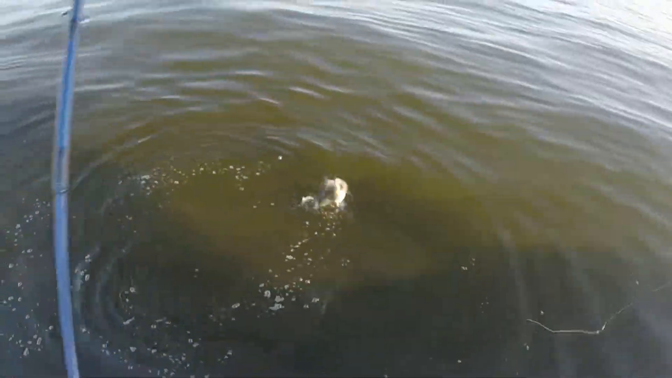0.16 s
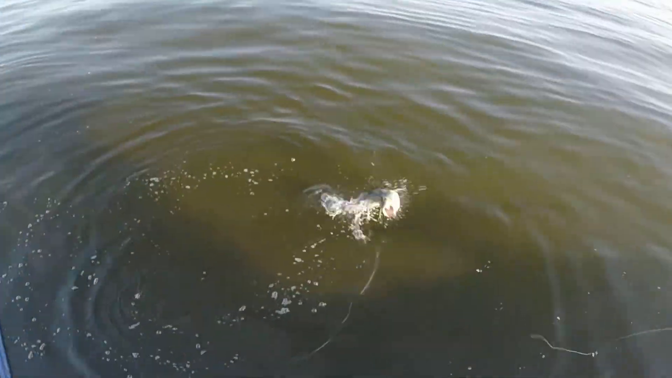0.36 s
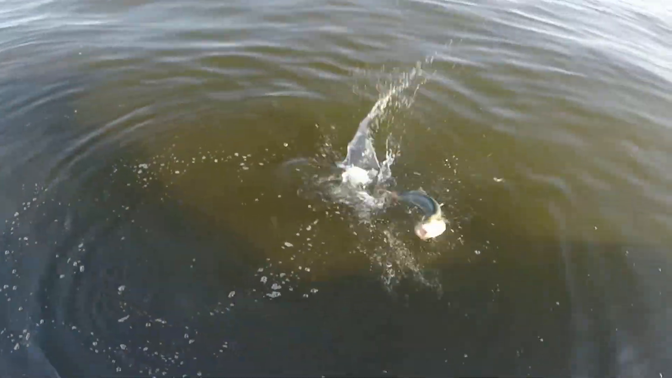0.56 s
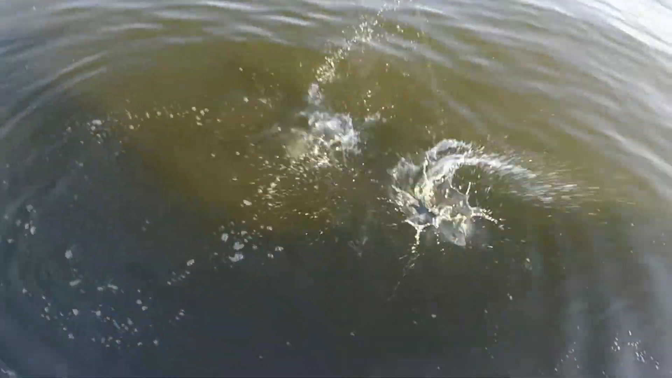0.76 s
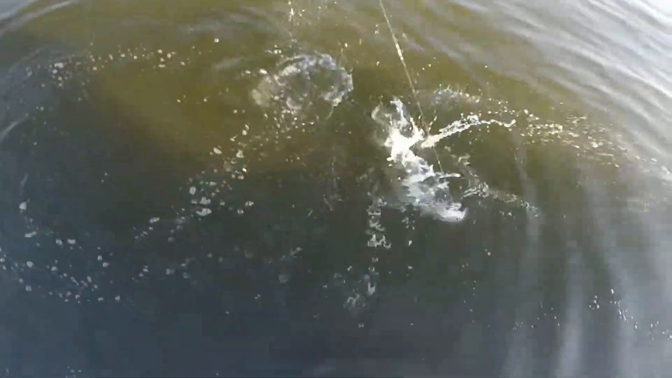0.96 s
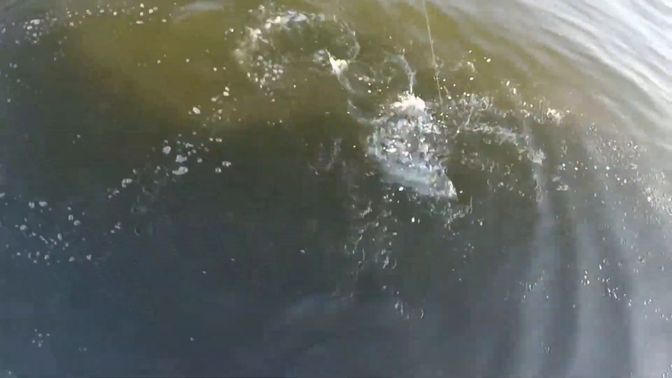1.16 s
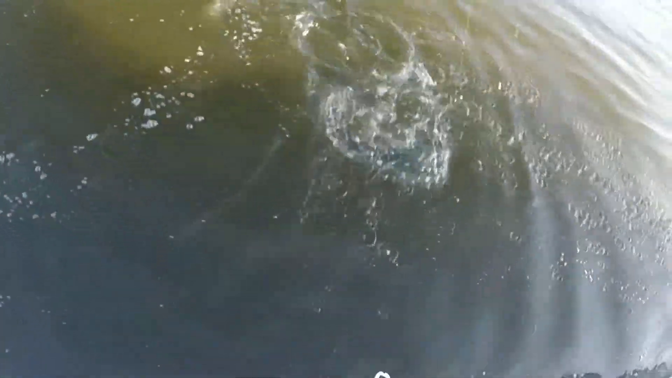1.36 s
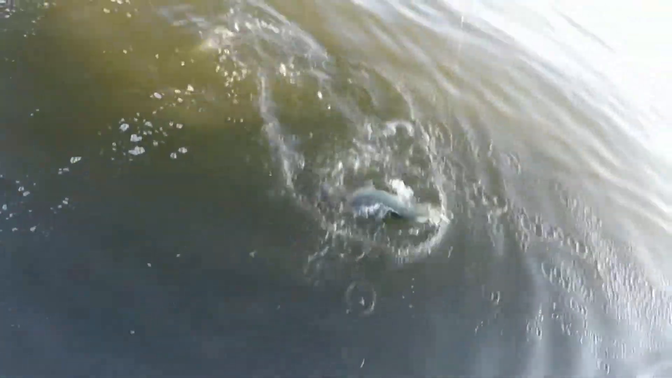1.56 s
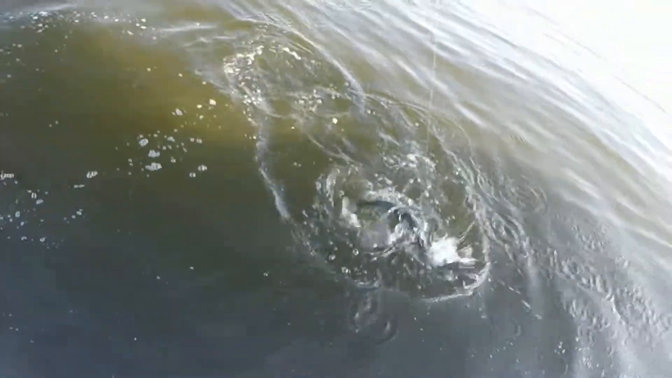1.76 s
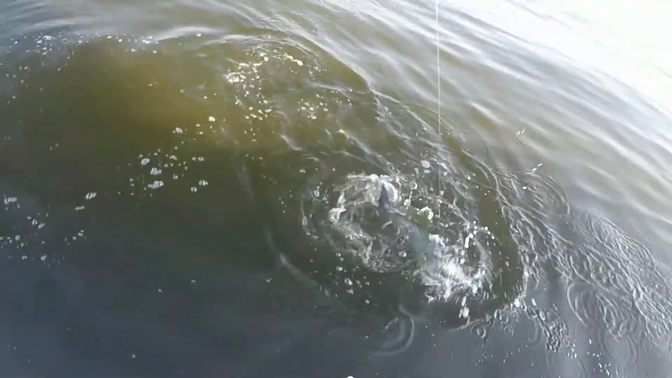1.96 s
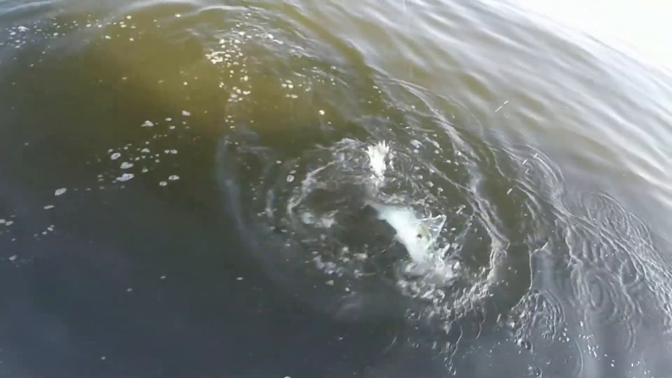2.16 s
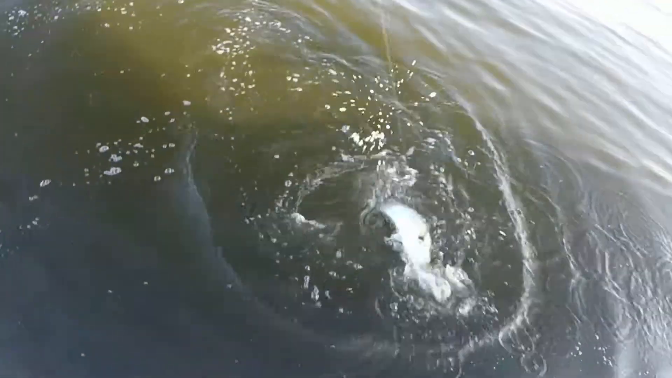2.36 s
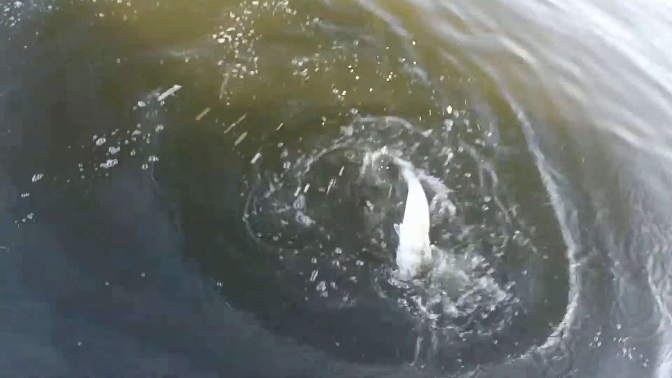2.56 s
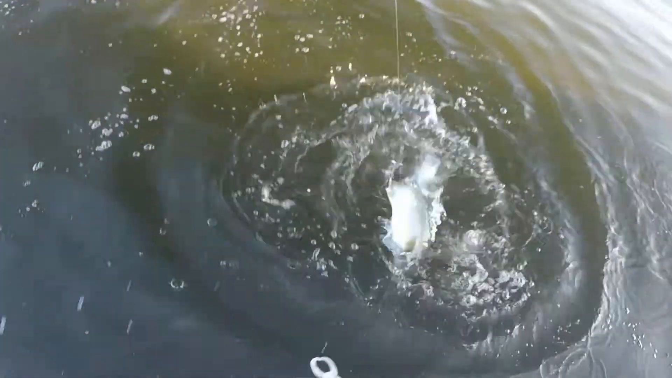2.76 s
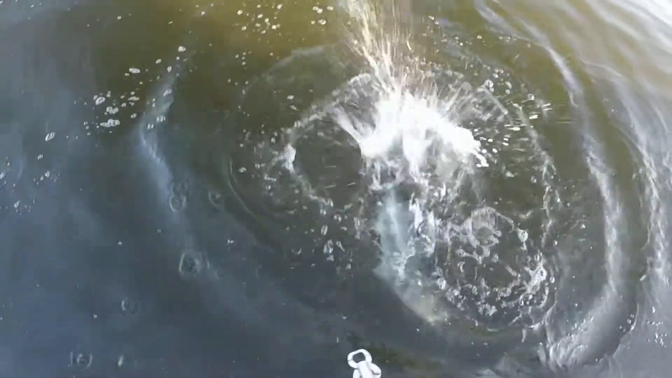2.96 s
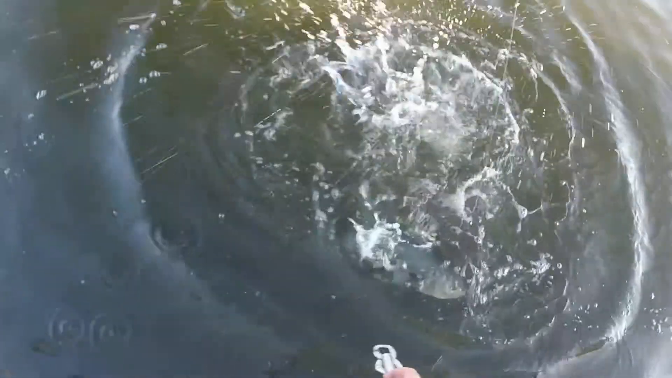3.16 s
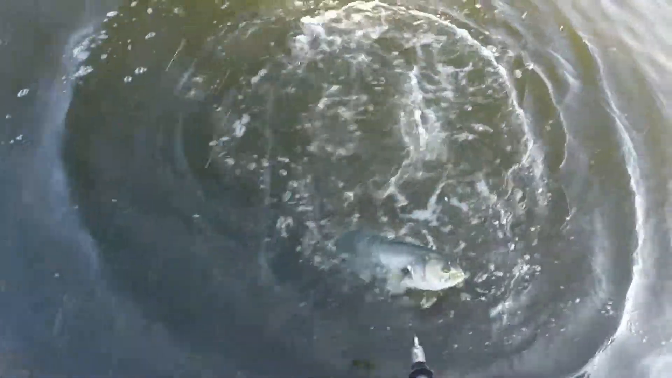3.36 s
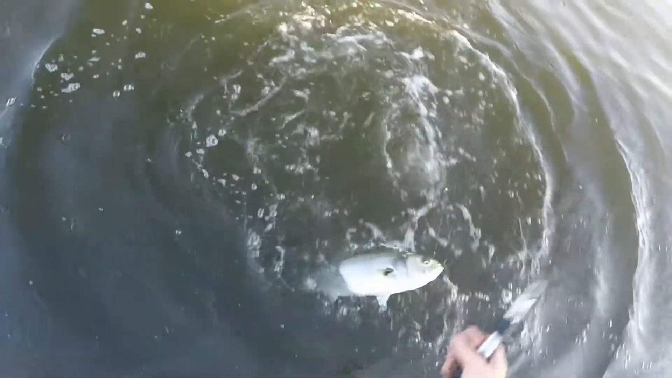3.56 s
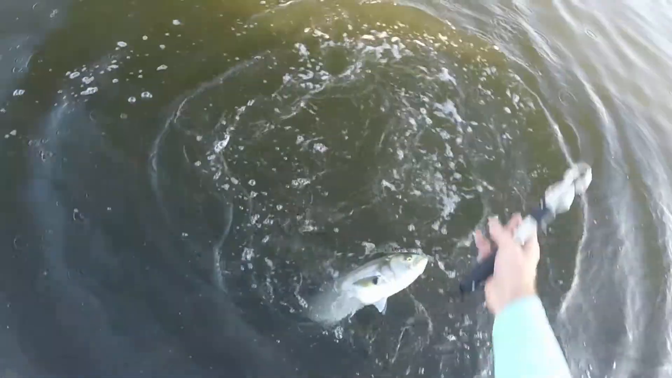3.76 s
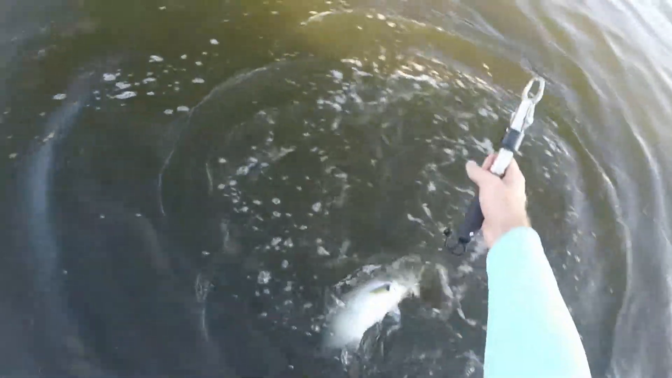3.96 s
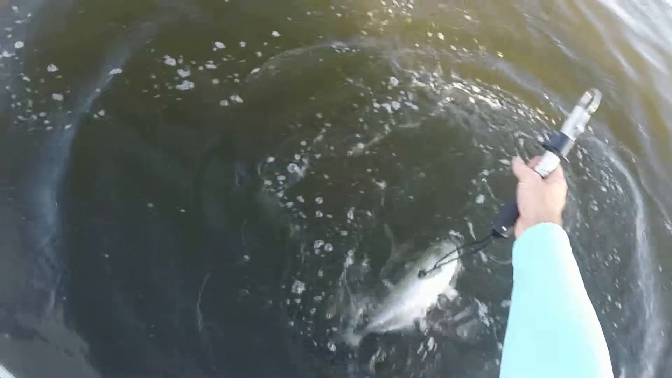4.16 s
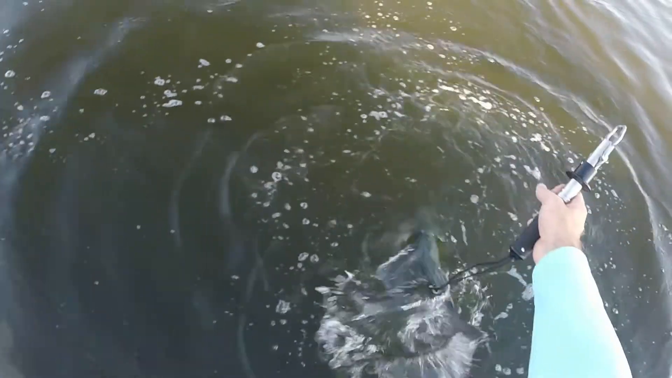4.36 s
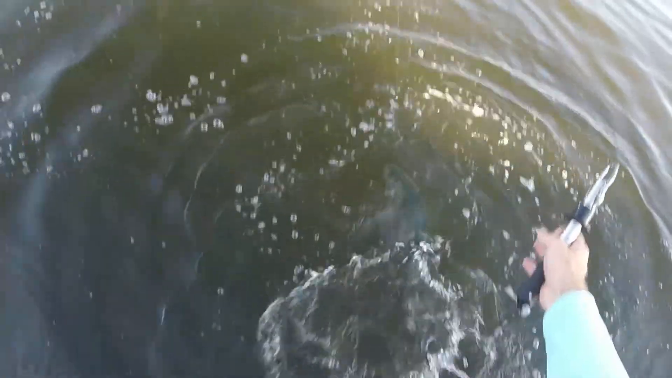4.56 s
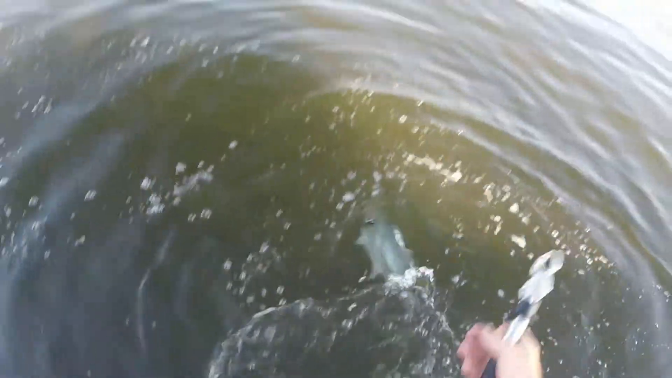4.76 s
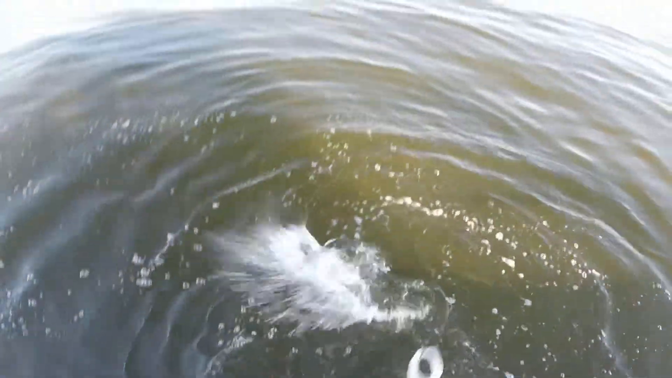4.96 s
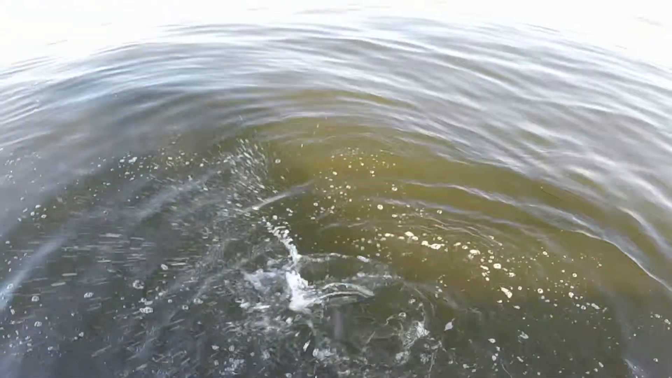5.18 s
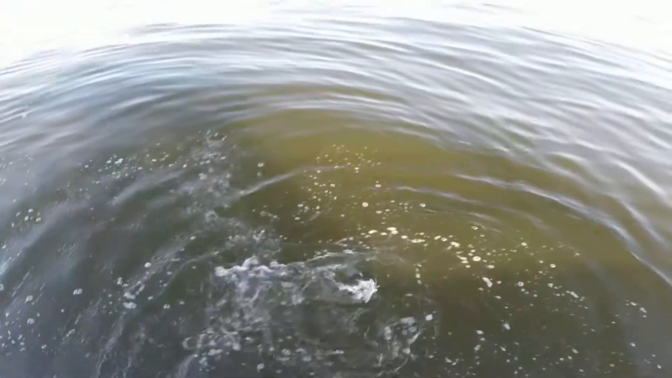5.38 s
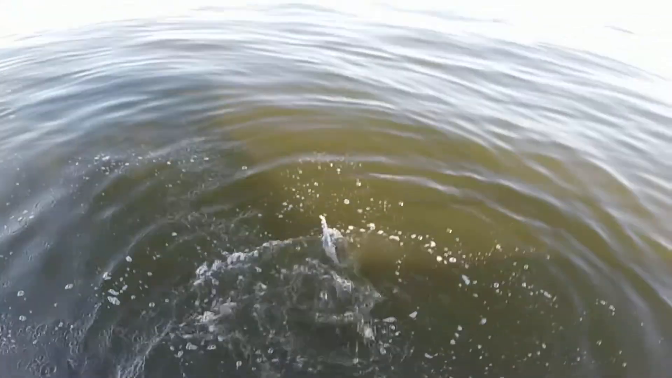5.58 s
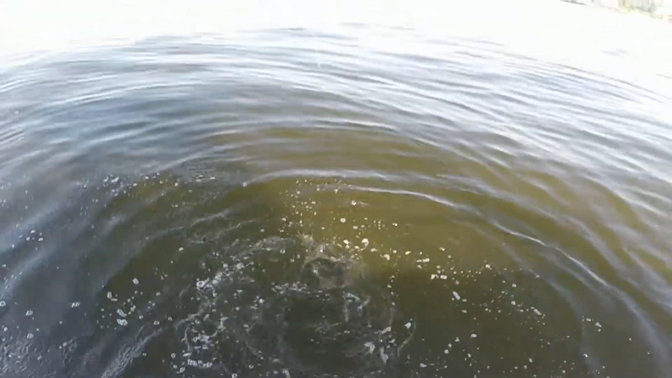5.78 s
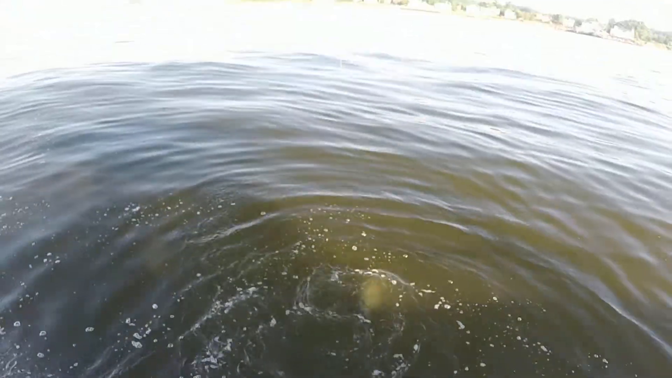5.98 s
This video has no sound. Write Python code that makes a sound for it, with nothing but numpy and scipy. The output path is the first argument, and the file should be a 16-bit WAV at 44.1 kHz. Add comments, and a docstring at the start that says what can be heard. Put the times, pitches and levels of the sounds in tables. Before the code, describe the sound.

A hooked fish thrashes at the surface beside a small boat, throwing irregular bursts of spray with slaps, spattering drops and small gurgles. The microphone sits inside a sealed camera housing, so the water sounds thin and boxy over low rumble and faint hiss. Two deep thumps come through the mount early on, the splashing peaks midway, and something hard knocks the hull before the last thrash.

```python
"""A hooked fish thrashes beside a small boat, heard from inside a sealed camera housing.
Low rumble, amplifier hiss and faint swirling water run from the start. At 0.1 s a jolt of the wearer
thumps through the mount. From 0.2 s the fish throws spray, with slaps, spatters and later gurgles;
the shell's resonances colour the spray and cracks. A second jolt comes at 2 s, the loudest slaps
near 3 s. At 4.8 s something hard knocks the hull; the last thrash follows at 5.4 s."""
import sys
import numpy as np
from scipy import signal
from scipy.fft import rfft, irfft, next_fast_len
from scipy.io import wavfile

SR = 44100
rng = np.random.default_rng(int(sys.argv[2]) if len(sys.argv) > 2 else 0)


def dump_mix(stems):
    """Bounce the given channels to the path in sys.argv[1] as a 16-bit WAV at rate SR."""
    frames = np.atleast_2d(stems).T  # one column per channel
    limited = np.clip(frames, -1, 1)  # hard clip at full scale
    pcm = np.round(limited * 32767).astype(np.int16)
    wavfile.write(sys.argv[1], SR, pcm)


N = 265683

# Sway of the mount. Each row: time in seconds, rumble level in dB.
MOUNT_SWAY = [(0, -70), (0.08, -41), (0.3, -48), (0.4, -47), (0.62, -48), (0.69, -57), (0.78, -34),
              (0.96, -39.5), (1.05, -51.5), (1.33, -42.5), (1.43, -60), (1.53, -42), (1.9, -40), (2.0, -47),
              (2.2, -43.5), (2.32, -58), (2.38, -46), (3.25, -48), (3.57, -53), (3.76, -38), (3.88, -53),
              (3.95, -47), (4.8, -48), (5.19, -44.5), (5.55, -44), (5.83, -54), (5.93, -44), (6.02, -68)]
# Rumble spectrum. Each row: frequency in Hz, relative density in dB.
RUMBLE_SPECTRUM = [(8, 4), (14, 21), (28, 8.5), (45, -2), (80, -23), (140, -37), (400, -70), (2000, -120)]
# Amplifier hiss spectrum. Each row: frequency in Hz, relative density in dB.
HISS_SPECTRUM = [(30, -33), (55, -1.5), (147, -2.5), (287, -6), (499, -9), (1100, -14.5), (1540, -17),
                 (2310, -20.5), (4000, -25.5), (7000, -30.5), (12000, -37.5), (13500, -43), (15300, -43)]
# Circuit tones. Each row: frequency in Hz, rms level in dB.
CIRCUIT_TONES = [(14147, -95), (14207, -95)]
# Shell resonances. Each row: centre in Hz, width in Hz, gain in dB.
HOUSING_MODES = [(741, 274, -4), (1560, 187, 0), (1980, 365, -1.5), (2780, 240, 2.5), (3254, 316, 0.5),
                 (4664, 370, 1), (5800, 234, -2), (6160, 400, -6.5), (6970, 580, -7.5), (8400, 5300, -21),
                 (11500, 1400, -19.5), (13200, 1500, -33)]
# Restless water between thrashes. Each row: time in seconds, spray gain in dB.
WATER_SWIRL = [(0, -68), (0.3, -69), (0.7, -64), (1.4, -64.5), (1.7, -63), (1.85, -58.5), (2.1, -62.5),
               (2.33, -67), (2.65, -62.5), (2.95, -59), (3.35, -60.5), (3.7, -66), (3.95, -67), (4.3, -64),
               (4.8, -65.5), (5.25, -63.5), (5.6, -67.5), (6.02, -74)]
# Sheets of spray thrown by the fish. Each row: end of the rise in seconds, spray gain in dB,
# hold in seconds, fine droplets in dB relative to that gain.
FISH_THRASHES = [(0.242, -59, .005, -16), (0.33, -56, 0.043, -11.5), (0.46, -62.5, .17, -3.5),
                 (0.713, -57, .1, -1.5), (0.902, -54.5, .035, -6.5), (1.042, -60.5, 0.058, -10),
                 (1.105, -57.5, .14, -8), (1.305, -63.5, 0.076, -16), (1.562, -66.5, .08, -20),
                 (1.772, -51.5, .025, -9), (2.112, -54, .045, -8), (2.186, -56, 0.0088, -5),
                 (2.405, -58.5, .04, -4.5), (2.506, -62.5, 0.052, -6), (2.718, -55, 0.043, -6),
                 (2.775, -57.5, .02, -5), (2.811, -52.5, 0.035, -8), (2.996, -54, 0.031, -2),
                 (3.09, -57, .19, -6), (3.327, -62.5, .035, 0), (3.45, -57, .005, -17),
                 (3.865, -63, 0.039, -5), (4.25, -64, .008, -18), (4.41, -57, .16, -4),
                 (4.68, -56.5, 0.011, -12), (5.009, -55, .04, -8), (5.08, -58, .14, -10.5),
                 (5.362, -63.5, 0.017, -2)]
# Slaps and plops. Each row: start in seconds, level in dB, bubble pitch in Hz, bubble t60 in seconds,
# crack in dB relative to the bubble.
WATER_SLAPS = [(0.065, -48, 2250, 0.074, -15), (0.1184, -49, 4700, 0.032, -7), (0.243, -48, 1890, .025, -8),
               (0.461, -34, 330, 0.017, -12), (0.4655, -42, 1350, 0.017, 1.5), (0.665, -46, 3000, .02, -6),
               (0.7037, -48, 4730, .018, 0), (0.7189, -31.5, 2690, 0.018, -6), (0.7785, -49, 2710, .02, -4),
               (0.7978, -46, 2780, .026, 1), (0.9164, -43, 4810, .02, -4), (0.973, -47, 3200, .02, -6),
               (1.0, -54, 3050, .02, -8), (1.026, -45, 2780, .022, -8), (1.05, -46, 3090, .02, -4),
               (1.1057, -46, 4650, .016, 0), (1.1277, -41.5, 3300, .025, -5), (1.1622, -43, 1980, .02, -1),
               (1.249, -47, 4370, .02, -9), (1.305, -46.5, 1550, .034, -10),
               (1.436, -47.5, 1720, .018, 3.5), (1.6155, -43.5, 1640, .025, -7),
               (1.7708, -45, 1890, .02, 1), (2.1048, -46, 1620, 0.016, 2), (2.134, -43, 2620, .022, -3),
               (2.1792, -42, 3000, .018, 3), (2.395, -43, 1560, 0.03, -7), (2.4652, -41.5, 1990, .027, -9),
               (2.589, -39.5, 3280, .013, -4), (2.6932, -46, 3090, .02, -9), (2.7258, -43, 3160, .02, -4),
               (2.782, -36.5, 3150, 0.014, -5), (2.8091, -41, 2800, 0.022, -2),
               (2.9972, -27.5, 3370, .016, -3), (2.9985, -45, 640, 0.028, -10),
               (2.999, -31, 1464, 0.028, -5), (2.9995, -31, 760, 0.018, -14), (3.0002, -25, 4660, .014, 0),
               (3.002, -33, 2550, 0.027, -15), (3.0098, -38, 3550, .02, 0), (3.0864, -46, 3000, .02, -4),
               (3.1004, -42, 3310, 0.02, -8.5), (3.18, -23, 2560, 0.0099, -23),
               (3.1805, -37, 1380, 0.017, -16), (3.225, -44, 4460, .02, -1), (3.4442, -41, 2250, .023, -5),
               (3.481, -46, 4680, .02, -13), (4.2531, -44, 2830, .023, -11), (4.333, -48, 1900, .02, -4),
               (4.412, -47, 3270, .02, -8), (4.442, -38, 2740, 0.031, -2), (4.4883, -41.5, 1600, .02, -7),
               (4.5529, -46, 2660, .026, 2), (4.6788, -39.5, 1364, .04, -9), (4.966, -46.5, 2820, 0.022, 1),
               (5.009, -50, 2750, .025, -1), (5.02, -38.5, 2630, .02, 1), (5.0205, -37, 1900, 0.021, -7),
               (5.1351, -44, 1440, .014, -2), (5.1724, -51, 2090, .02, -4), (5.3729, -50, 2780, .017, 2)]
# Jolts of the wearer. Each row: start in seconds, level in dB, first and last frequency in Hz,
# length in seconds.
MOUNT_JOLTS = [(0.1074, -19.3, 33.5, 8.5, .118), (2.0296, -15.7, 32.3, 13.4, .124)]
# Spatters of fine drops. Each row: start in seconds, level in dB, mist in dB relative to the drops.
DROP_SPATTERS = [(0.335, -50, -11), (0.569, -52, -7), (0.5895, -44.5, -12), (0.66, -55, -16),
                 (0.699, -48, -14), (0.716, -37.5, -21), (0.7845, -54, -25), (0.913, -42, -16),
                 (1.021, -49.5, -9), (1.104, -51, -14), (2.115, -46, -18), (2.176, -40.5, -31),
                 (2.5238, -44.5, -22), (2.588, -47, -22), (2.7401, -49, -19), (2.8144, -44, -21),
                 (2.825, -47, -8), (2.927, -47, -23), (2.979, -53, -3), (2.9972, -30, -21),
                 (3.001, -39, -21), (3.088, -49, -22), (3.147, -51.5, -1), (3.264, -47, -18),
                 (3.819, -57, -9), (3.906, -47, -25), (4.0302, -47.5, -8), (4.443, -52, -24),
                 (4.49, -49, -24), (4.5619, -47, -20), (4.677, -46, -26), (5.0149, -49, -7),
                 (5.029, -42.5, -4), (5.1494, -50, -13), (5.5217, -51.5, -22)]
# Draining air pockets. Each row: start in seconds, level in dB, pitch in Hz, length in seconds.
AIR_POCKETS = [(1.529, -58.5, 1640, 0.11), (1.755, -55, 755, 0.039), (2.127, -52, 514, 0.05),
               (2.222, -55, 1400, 0.053), (3.134, -52, 785, 0.021), (3.21, -52, 176, 0.073),
               (4.681, -62, 1350, 0.053), (5.057, -56, 1360, 0.059), (5.105, -55.5, 1450, 0.077),
               (5.069, -59, 2870, 0.083), (5.178, -63, 2700, 0.053)]
# Blows on the hull. Each row: time in seconds, strength in dB.
HULL_BLOWS = [(4.8292, -1.5), (4.859, -26.5)]
# Modes of hull and mount. Each row: frequency in Hz, gain in dB, t60 in seconds, sign of first swing.
HULL_MODES = [(25.3, -24.5, 0.61, 1), (72, -25, 0.21, 1), (132, -19, 0.19, -1), (162, -15.5, 0.061, -1),
              (233, -13, 0.032, 1), (356, -18.5, 0.014, 1), (537, -16.5, 0.02, 1), (860, -22, 0.015, -1),
              (1027, -22, 0.022, -1), (1740, -23, 0.012, -1), (2535, -22.5, 0.0097, 1),
              (3700, -44, 0.011, -1), (5700, -42, .015, 1)]

HISS_DB, CUTOFF_HZ = -55, 15500
SHEET_RISE_S, SHEET_FALL_DB_PER_S = 0.018, 282
SWIRL_FINE_DB = -9   # relative to the swirl
CRACK_DECAY_S, SPATTER_DECAY_S = 0.0021, 0.0041
RATTLE_GAIN_DB, RATTLE_T60_S = -44.5, 0.14


def from_db(db):
    return 10 ** (np.asarray(db) / 20)


def unit_rms(x):
    return x / np.sqrt(np.mean(x ** 2) + 1e-20)


def level_curve_db(rows):
    """Linear interpolation, one value per sample."""
    times_s, levels_db = np.transpose(rows)
    return np.interp(np.arange(N) / SR, times_s, levels_db)


def add(out, start_s, sound):
    at = round(start_s * SR)
    out[at:at + len(sound)] += sound[:N - at]


def coloured_noise(spectrum):
    """Steady noise of the given spectrum; rms 1."""
    size = next_fast_len(N)
    hz, db = np.transpose(spectrum)
    bins_hz = np.arange(size // 2 + 1) * SR / size
    gain = from_db(np.interp(np.log(bins_hz + 1), np.log(hz), db))
    return unit_rms(irfft(gain * rfft(rng.standard_normal(size)), size)[:N])


def drift(rate_hz):
    """Slow random wander; rms 1."""
    r = np.exp(-2 * np.pi * rate_hz / SR)
    return unit_rms(signal.lfilter([1], [1, -2 * r, r * r], rng.standard_normal(N + SR))[SR:])


def ring(drive, hz, t60_s):
    """Resonator: a unit click starts a decaying sine of height 1."""
    r, w = from_db(-60 / (t60_s * SR)), 2 * np.pi * hz / SR
    return signal.lfilter([0, np.sin(w)], [1, -2 * r * np.cos(w), r * r], drive + 1e-18)


def mount_rumble():
    """Lumpy infrasound as the mount sways."""
    level_db = level_curve_db(MOUNT_SWAY) + 3.2 * drift(rate_hz=10)
    return from_db(level_db) * coloured_noise(RUMBLE_SPECTRUM)


def circuit_noise():
    """Amplifier hiss and two faint high tones."""
    t = np.arange(N) / SR
    tones = sum(np.sqrt(2) * from_db(db) * np.sin(2 * np.pi * hz * t) for hz, db in CIRCUIT_TONES)
    return from_db(HISS_DB) * coloured_noise(HISS_SPECTRUM) + tones


def housing(x):
    """The shell passes sound mainly at its resonances, neighbours in opposite phase."""
    out = 0
    for k, (hz, width_hz, db) in enumerate(HOUSING_MODES):
        r = np.exp(-np.pi * abs(width_hz) / SR)
        b = (1 - r * r) / 2 * np.array([1, 0, -1])
        a = [1, -2 * r * np.cos(2 * np.pi * hz / SR), r * r]
        out = out + (-1) ** k * from_db(db) * signal.lfilter(b, a, x)
    return out


def spray_gains():
    """Each thrown sheet rises, holds and rains out over the swirl; powers add."""
    t = np.arange(N) / SR
    power = from_db(level_curve_db(WATER_SWIRL)) ** 2
    fine_power = power * from_db(SWIRL_FINE_DB) ** 2
    for crest_s, db, hold_s, fine_db in FISH_THRASHES:
        rise = np.clip((t - crest_s) / SHEET_RISE_S + 1, 0, 1)
        fall_db = SHEET_FALL_DB_PER_S * np.maximum(t - crest_s - hold_s, 0)
        sheet_power = (rise * from_db(db - fall_db)) ** 2
        power += sheet_power
        fine_power += sheet_power * from_db(fine_db) ** 2
    return np.sqrt(power), np.sqrt(fine_power)


def droplets(per_s, spread_db, band_hz, ring_cycles, clump_db):
    """Drops land in loud and soft clumps, each ringing a tiny bubble; rms 1 after the shell."""
    sizes = from_db(spread_db * np.minimum(rng.exponential(1, N), 5)) * rng.choice([-1, 1], N)
    landed = rng.random(N) < per_s / SR
    impacts = sizes * landed * from_db(clump_db * drift(rate_hz=28))
    pitch_index = rng.integers(0, 24, N)
    bubbles = 0
    for k, hz in enumerate(np.geomspace(*band_hz, 24)):
        t60_s = ring_cycles / hz
        struck = ring(impacts * (pitch_index == k), hz, t60_s)
        bubbles += ring(struck, hz, t60_s) * hz   # second pass: swells first, narrower band
    return unit_rms(housing(bubbles))


def spray():
    """Sheets of water hiss, coarse drops burble in the midrange, fine ones fizz above."""
    gain, fine_gain = spray_gains()
    midrange = signal.butter(2, [1800, 5200], "band", fs=SR, output="sos")
    hiss = signal.sosfilt(midrange, rng.standard_normal(N))
    sheet = unit_rms(housing(hiss * from_db(3.7 * drift(rate_hz=33))))
    coarse = droplets(per_s=1500, spread_db=3.35, band_hz=(1080, 5360), ring_cycles=12.6, clump_db=2.64)
    fine = droplets(per_s=4000, spread_db=3.7, band_hz=(5200, 12600), ring_cycles=6.8, clump_db=2.8)
    return gain * (from_db(-6.5) * sheet + from_db(-2.5) * coarse) + fine_gain * fine


def water_crack(noise, decay_s):
    """Breaking water heard through the shell; peak 1."""
    t = np.arange(len(noise)) / SR
    attack = 1 - np.exp(-t / (0.35 * decay_s))
    crack = housing(noise * np.exp(-t / decay_s) * attack)
    return crack / np.max(np.abs(crack))


def slaps():
    """Water cracks and traps a bubble whose pitch rises as it nears the surface."""
    out, t = np.zeros(N), np.arange(SR // 10) / SR
    attack = 1 - np.exp(-t / 0.00054)
    for start_s, db, hz, t60_s, crack_db in WATER_SLAPS:
        bubble = np.sin(2 * np.pi * hz * t * (1 + 1.4 * t)) * from_db(-60 * t / t60_s) * attack
        crack = water_crack(rng.standard_normal(len(t)), CRACK_DECAY_S)
        add(out, start_s, from_db(db) * (bubble + from_db(crack_db) * crack))
    return out


def jolts():
    """The mount swings two or three cycles, slowing as it settles."""
    out = np.zeros(N)
    for start_s, db, first_hz, last_hz, length_s in MOUNT_JOLTS:
        progress = np.arange(round(length_s * SR)) / (length_s * SR)
        phase = 2 * np.pi * np.cumsum(first_hz + (last_hz - first_hz) * progress) / SR
        overtone = from_db(-11) * (1 - progress) ** 2 * np.cos(2 * phase)   # sharpens early troughs
        swell = np.sin(np.pi * progress ** 0.65) ** 2
        add(out, start_s, from_db(db) * swell * (np.sin(phase) + overtone))
    return out


def spatters():
    """Tiny drops radiate only treble, the finest mist only the top octave."""
    out = np.zeros(N)
    treble = signal.butter(3, 4500, "high", fs=SR, output="sos")
    top_octave = signal.butter(3, 8000, "high", fs=SR, output="sos")
    for start_s, db, mist_db in DROP_SPATTERS:
        noise = rng.standard_normal(SR // 10)
        drops = water_crack(signal.sosfilt(treble, noise), SPATTER_DECAY_S)
        mist = water_crack(signal.sosfilt(top_octave, noise), SPATTER_DECAY_S)
        add(out, start_s, from_db(db) * (drops + from_db(mist_db) * mist))
    return out


def gurgles():
    """A draining air pocket is shaken at random: noise in one narrow resonance."""
    out, t = np.zeros(N), np.arange(SR // 5) / SR
    for start_s, db, hz, length_s in AIR_POCKETS:
        swell = np.sin(np.pi * np.minimum(t / length_s, 1))
        tone = unit_rms(ring(rng.standard_normal(len(t)), hz, t60_s=15 / hz + 0.0078))
        add(out, start_s, from_db(db) * swell * tone)
    return out


def hull_knock():
    """A blow and a faint second contact ring every hull mode; loose gear rattles briefly."""
    clicks = np.full(N, 1e-18)
    for time_s, db in HULL_BLOWS:
        clicks[round(time_s * SR)] += from_db(db)
    contacts = signal.sosfilt(signal.butter(4, 4500, fs=SR, output="sos"), clicks)
    modes = sum(np.sign(sign) * from_db(db) * ring(contacts, hz, t60_s)
                for hz, db, t60_s, sign in HULL_MODES)
    shaking = signal.lfilter([1], [1, -from_db(-60 / (RATTLE_T60_S * SR))], clicks)
    dull = signal.butter(4, [300, 3000], "band", fs=SR, output="sos")
    band_makeup = np.sqrt(SR / 5400)
    rattle = signal.sosfilt(dull, shaking * rng.standard_normal(N)) * band_makeup
    return modes + from_db(RATTLE_GAIN_DB) * rattle


def scene():
    """All sources at one microphone."""
    water = spray() + slaps() + spatters() + gurgles()
    return (water + jolts() + hull_knock() + mount_rumble() + circuit_noise())[None]


def record(dry):
    """Steep low-pass, 70 dB down from the cutoff."""
    return signal.sosfilt(signal.cheby2(20, 70, CUTOFF_HZ, fs=SR, output="sos"), dry)


dry = scene()
out = record(dry)
dump_mix(out)
```